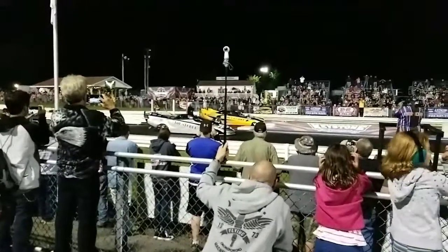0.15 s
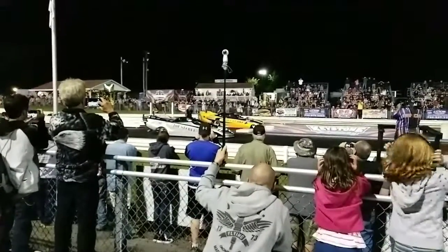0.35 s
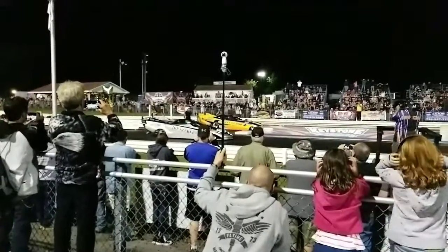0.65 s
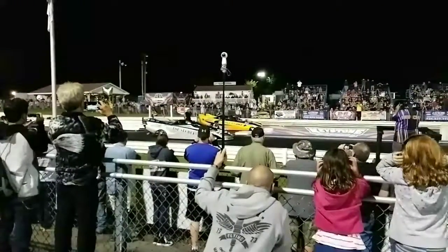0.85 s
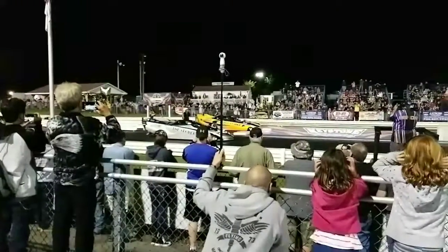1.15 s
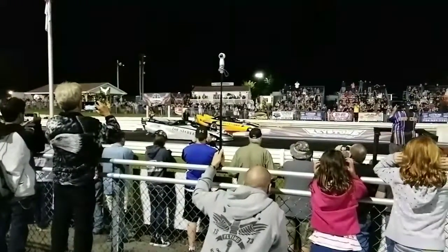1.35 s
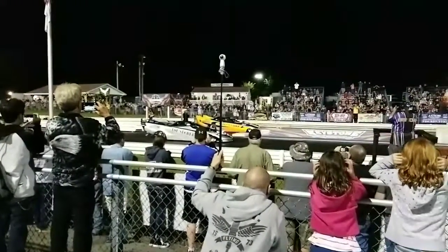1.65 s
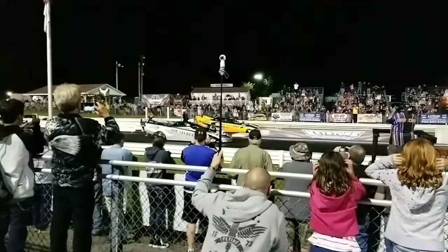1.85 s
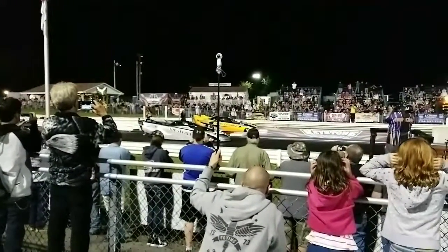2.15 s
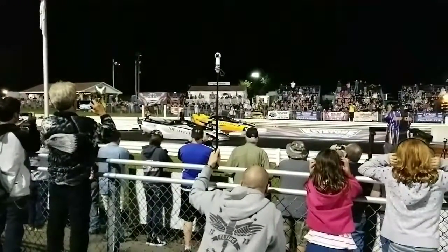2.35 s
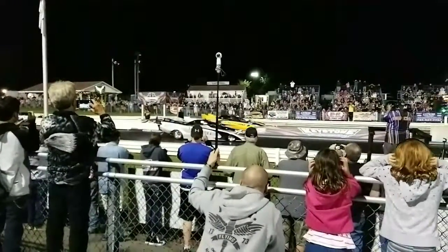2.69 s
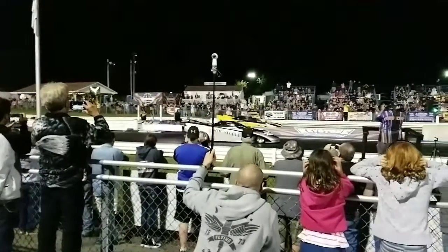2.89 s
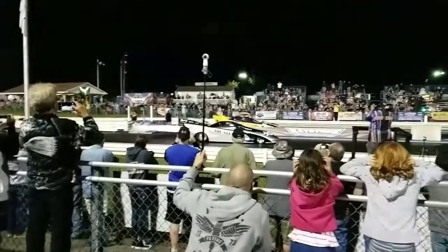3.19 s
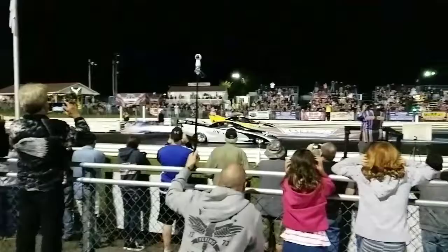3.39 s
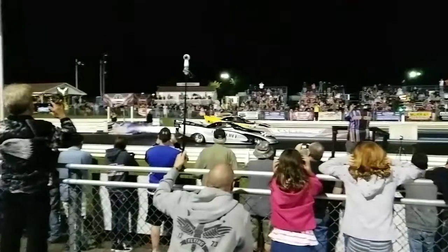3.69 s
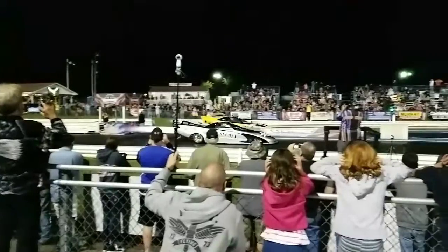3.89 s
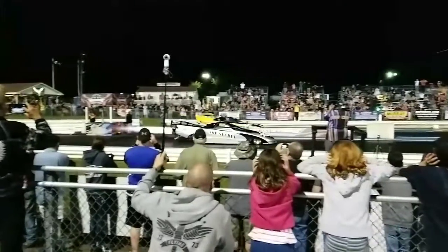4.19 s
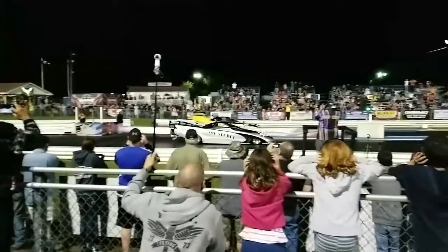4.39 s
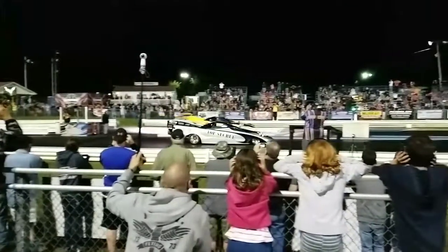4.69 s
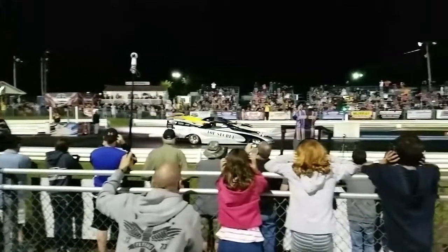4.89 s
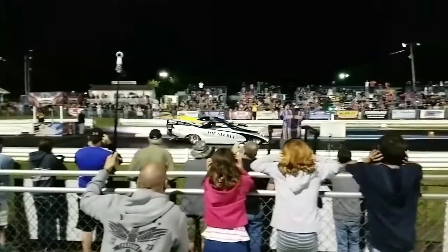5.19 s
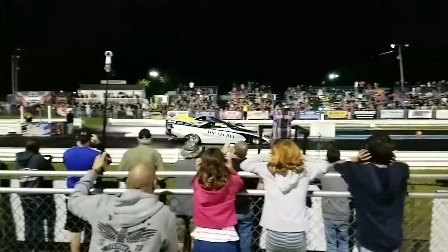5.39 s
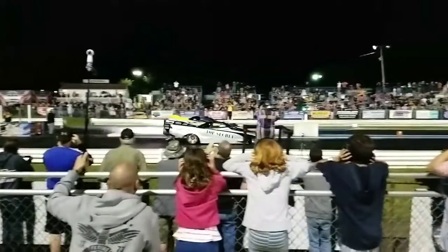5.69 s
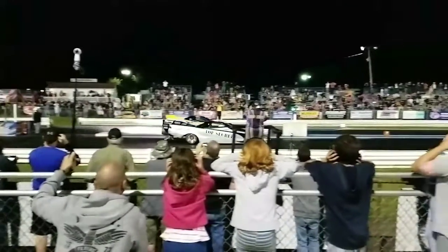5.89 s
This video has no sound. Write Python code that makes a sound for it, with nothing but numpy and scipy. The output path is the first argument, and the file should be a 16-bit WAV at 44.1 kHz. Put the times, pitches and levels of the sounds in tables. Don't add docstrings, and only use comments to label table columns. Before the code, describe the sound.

From 0 s, two jet cars idle very loudly outdoors, close to a phone at the fence: a thick low exhaust roar, rough and fluttering, under a wide bright intake hiss, with faint wavering compressor whine. The level settles upward in the first half second. A tailpipe howl around 600 Hz swells to about 1.2 s, sagging slightly, then stops short. The idle continues, its hiss creeping up. At about 2.4 s an afterburner lights, building by 2.7 s into a massive, crackling, distorted blast that pushes the hiss and tones down. At 3.0 s it abruptly switches to slow motion: far quieter, dull, deep and stretched, a lumpy rumbling roar with little treble, stronger at first on the right. It holds nearly steady to the end at about 6 s. Small dry ticks appear on the right near 4.6 and 4.8 s, the sharpest at 5.2 s, a faint last one at 5.3 s.

```python
import sys
import numpy as np
from scipy import signal
from scipy.fft import rfft, irfft, next_fast_len
from scipy.io import wavfile
from scipy.ndimage import uniform_filter1d

SR = 44100
rng = np.random.default_rng(int(sys.argv[2]) if len(sys.argv) > 2 else 0)


def unload_audio(sound):
    columns = np.transpose(np.atleast_2d(sound))
    steps = np.round(np.clip(columns, -1, 1) * 32767)
    wavfile.write(sys.argv[1], SR, steps.astype(np.int16))


def ratio(d):
    e = np.asarray(d, float) / 20
    return 10 ** e


N = 266805
TIME = np.arange(N) / SR
SIZE = next_fast_len(N)
HZ = np.arange(SIZE // 2 + 1) * SR / SIZE + 1e-3
SWITCH_S, SLOW = 3.0123, 8

# (frequency [Hz], width [Hz], left level [dB], right level [dB])
GROUND = [(356, 31, -5.5, -2.5), (416, 58, 0.5, -5.5), (497, 86, -7, -1.5), (565, 280, 3.5, 2.5),
          (813, 120, -0.5, -1)]
# (frequency [Hz], width [Hz], left level [dB], right level [dB])
PORTS = [(1530, 370, 0, 2.5), (2610, 440, -1, -8.5), (4700, 750, -2.5, -3), (7160, 900, 8.5, -7.5),
         (8640, 900, -6.5, -5), (8800, 300, -2.5, -3.5), (9990, 1400, 3, -7), (11820, 3900, 1, 8.5),
         (13440, 1100, 7.5, -1), (14400, 600, 2, 0.5)]
# (frequency [Hz], width [Hz], left level [dB], right level [dB])
PORTS_FLAME = [(1612, 420, -1, 3.5), (2800, 500, 0.5, -4), (3400, 530, -2, 2), (7100, 1100, 7.5, -3),
               (8900, 1300, -7.5, -2.5), (9800, 680, -0.5, -4), (11680, 1300, -0.5, 8),
               (13000, 2000, 4, -0.5)]
# (frequency [Hz], idle [0-1], burner [0-1])
LIKENESS = [(30.5, 0.63, 0.4), (100, 1, 0.2), (280.2, 0.92, 0.9), (371, .78, 0), (704, .8, 0.91),
            (1404, 0.4, 0.07), (2196, .35, 0.5), (3445, 0.05, 0.3), (15000, 0.03, 0)]


def ramp(start_s, length_s):
    return np.clip((TIME - start_s) / length_s, 0, 1)


def walk(rate):
    hold = int(SR / rate)
    held = np.repeat(rng.standard_normal(N // hold + 1), hold)[:N]
    return 1.3 * uniform_filter1d(uniform_filter1d(held, hold), hold)


def spectrum(table, hz):
    f, *columns = np.transpose(table)
    return np.array([np.interp(np.log(hz), np.log(f), column) for column in columns])


def bumps(table, hz):
    return sum(np.outer(db, np.exp(-0.5 * (2 * (hz - f) / width) ** 2)) for f, width, *db in table)


def turbulence(db, likeness, lag_ms, flicker_db, rate, octaves, lean=0., size=5):
    shared, own = rfft(rng.standard_normal((2, SIZE)))
    likeness = np.clip(likeness, 0, 1)
    lag = np.exp(2j * np.pi * HZ * lag_ms / 1000)
    right = (likeness * shared + np.sqrt(1 - likeness ** 2) * own) * lag
    pair = np.array([shared, right]) * ratio(db)
    out = 0
    for octave in octaves:
        band = np.cos(np.pi / 2 * np.clip(np.log2(HZ) - octave, -1, 1)) ** 2
        out = out + irfft(pair * band, SIZE)[:, :N] * ratio(flicker_db * walk(rate))
    spread = out.std(axis=1, keepdims=True)
    squared = uniform_filter1d(out, size) ** 2
    crests = squared - np.mean(squared, axis=1, keepdims=True)
    out = out + np.reshape(lean, (-1, 1)) * crests / spread
    return out / np.sqrt(np.mean(out ** 2))


def afterburner():
    # (frequency [Hz], left level [dB], right level [dB])
    flame_spectrum = [(20, -17, -12), (40.5, -19.5, -11.5), (139.1, 0.5, -0.5), (210.4, -10, -1),
                      (400, -5.5, -4), (900, -10, -4.5), (1880, -11, -5), (2600, -12.5, -12),
                      (4380, -21, -20.5), (7000, -24.5, -19.5), (10070, -20, -26), (14500, -25, -23.5)]
    light_s, build_s, level_db = 2.44, 0.29, -10
    colour = spectrum(flame_spectrum, HZ) + bumps(GROUND + PORTS_FLAME, HZ)
    flame = turbulence(colour, spectrum(LIKENESS, HZ)[1], lag_ms=-0.13, flicker_db=0.4, rate=25,
                       octaves=range(4, 15), lean=[0.06, 0])
    return ratio(level_db) * ramp(light_s, build_s) * flame


def slowed_burner():
    # (frequency [Hz], left level [dB], right level [dB])
    far_spectrum = [(100, -14.5, -3), (250, -2, 2.5), (500, -7, -2.5), (1010, -7.5, -4), (1637, -10, -1.5),
                    (2040, -10.5, -8.5), (2860, -14, -7.5), (3900, -19, -21), (6900, -24, -17.5),
                    (9700, -23.5, -28), (13900, -28, -25.5), (16450, -26.5, -27.5), (20860, -35.5, -41)]
    true_hz = SLOW * HZ
    colour = spectrum(far_spectrum, true_hz) + 1.09 * bumps(PORTS_FLAME, true_hz)
    roar = turbulence(colour, 0.69 * spectrum(LIKENESS, true_hz)[1], lag_ms=-1.204, flicker_db=0.78,
                      rate=6.5, octaves=range(3, 13), lean=[0.12, -0.01], size=40)
    roar[1] = 2.68 * np.tanh(roar[1] / 2.83)
    since = TIME - SWITCH_S
    level_db = -30 + 0.05 * since
    pan_db = -5 + 0.35 * since
    return roar * ratio(level_db + 6 + np.array([pan_db + 9, -pan_db - 0.5]) / 2)


def exhaust_roar():
    # (frequency [Hz], left level [dB], right level [dB])
    roar_spectrum = [(19.85, -25.5, -29.5), (37.2, -28.5, -25.5), (70, -10.5, -12.5), (115.2, -0.5, -1),
                     (160, 0.5, 0), (210, -0.5, -3), (295.6, -6, -4), (345, -7, -9), (900, -10, -9),
                     (2050, -9, -9), (2180, -10.5, -9), (3120, -20, -15.5), (4613, -24.5, -32.5)]
    colour = spectrum(roar_spectrum, HZ) + bumps(GROUND + PORTS, HZ)
    return turbulence(colour, spectrum(LIKENESS, HZ)[0], lag_ms=-0.091, flicker_db=-0.24, rate=11,
                      octaves=range(4, 13))


def intake_hiss():
    # (frequency [Hz], left level [dB], right level [dB])
    hiss_spectrum = [(1495, -36.5, -29), (2530, -5, -12.5), (3470, 0.5, -6), (4960, -1, -4.5),
                     (7980, -2, -2), (11060, -2.5, -10), (14680, -6, -14.5)]
    colour = spectrum(hiss_spectrum, HZ) + bumps(GROUND + PORTS, HZ)
    return turbulence(colour, spectrum(LIKENESS, HZ)[0], lag_ms=-0.1, flicker_db=-0.5, rate=22,
                      octaves=range(10, 15))


def tailpipe_howl():
    since = TIME - 1.2
    hz = (615 - 7.93 * since) * (1 + 0.011 * walk(18))
    swell_db_s, stop_db_s = 24.5, 179
    level_db = -29.5 + np.minimum(swell_db_s * since, -stop_db_s * since)
    howl = ratio(level_db + 3 * walk(14)) * np.sin(2 * np.pi * np.cumsum(hz) / SR)
    return np.sqrt(2) * howl * ratio([[1.5], [-1.5]])


def shaft_tones():
    # (multiple of shaft rate [-], level [dB])
    harmonics = [(10, -47), (11, -53), (12, -50), (14, -53), (17, -51), (21, -53), (23, -53), (31, -53)]
    shaft_hz = 301.7 * (1 + 0.000594 * walk(3))
    angle = 2 * np.pi * np.cumsum(shaft_hz) / SR
    tones = 0
    for multiple, db in harmonics:
        phase = rng.uniform(0, 2 * np.pi, (2, 1))
        tones = tones + ratio(db + 3.3 * walk(6.7)) * np.sin(multiple * angle + phase)
    return np.sqrt(2) * tones


def jets():
    push = ramp(2.6, 0.12)
    settle_db = -1.4 * (1 - ramp(0, 0.51))
    roar_db = -13.5 + 0.05 * TIME + settle_db - 7.5 * push
    hiss_db = -19.5 + 0.4 * TIME - 19 * push
    whine = ratio(22) * (shaft_tones() + tailpipe_howl())
    sound = afterburner() + ratio(roar_db) * exhaust_roar() + ratio(hiss_db) * (intake_hiss() + whine)
    return 1.9 * np.tanh(sound / 1.9)


def masked_gaps(x, frame, top_hz, starve_db, starve_hz):
    hz, _, cells = signal.stft(x, SR, "cosine", nperseg=frame)
    power = np.abs(cells) ** 2
    band = uniform_filter1d(power, size=8, axis=1)[:, 4::8].repeat(8, axis=1)
    band = np.pad(band, ((0, 0), (0, len(hz) - band.shape[1]), (0, 0)))
    loudness = uniform_filter1d(power.mean(axis=(0, 1)), size=15)
    swing = uniform_filter1d(rng.standard_normal((2, 1, len(loudness))), size=2, axis=2)
    loudness = loudness * ratio(2.4 * swing)
    safe = (hz < starve_hz[0]) | (hz > starve_hz[1])
    audible = band > loudness * ratio(2 * starve_db)
    keep = (safe[:, None] | audible) & (hz < top_hz)[:, None]
    return signal.istft(cells * keep, SR, "cosine", nperseg=frame)[1][:, :N]


def overflow(x):
    # (time [s], depth [dB], width [ms])
    folded_crests = [
        (4.59035, -14, .063),
        (4.83255, -18, .055),
        (5.1787, -11, .07),
        (5.179, -4.8, .027),
        (5.28812, -17, .055),
    ]
    ceiling = 0.21
    right, folds = x[1], 0
    for s, depth_db, width_ms in folded_crests:
        ms = 1000 * (TIME - s)
        right = right + (ceiling - right) * np.exp(-0.5 * (ms / 0.7) ** 2)
        side_ms = width_ms * np.where(ms > 0, 1.5, 0.8)
        folds = folds + ratio(depth_db) * np.exp(-0.5 * (ms / side_ms) ** 2)
    return np.array([x[0], right - folds])


def scene():
    slow = ramp(SWITCH_S, 0.021)
    step = np.where(TIME < SWITCH_S, 1, ratio(-15))
    normal = masked_gaps(jets(), frame=2048, top_hz=14560, starve_db=-12, starve_hz=(3000, 14560))
    swap = np.array([[1, 1], [1, -1.054]]) / np.sqrt(2)
    gapped = masked_gaps(swap @ slowed_burner(), frame=2048 * SLOW // 2, top_hz=20050 / SLOW,
                         starve_db=-10, starve_hz=(900, 1300))
    slowed = overflow(swap @ gapped)
    return step * np.cos(np.pi / 2 * slow) * normal + np.sin(np.pi / 2 * slow) * slowed


def band_limit(x):
    return signal.sosfilt(signal.butter(12, 14900, fs=SR, output="sos"), x)


def record(dry):
    mix = np.clip(dry, -1, 1)
    return band_limit(mix)


dry = scene()
out = record(dry)
unload_audio(out)
```